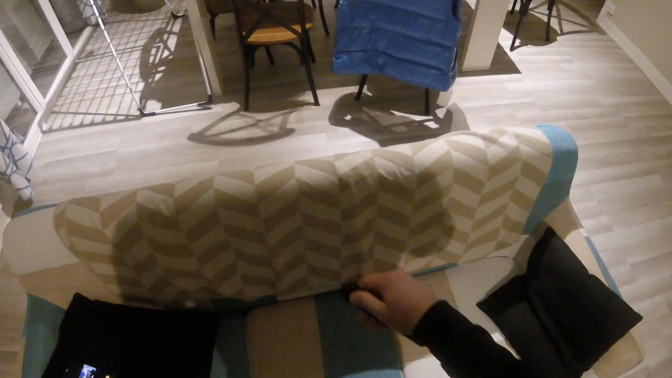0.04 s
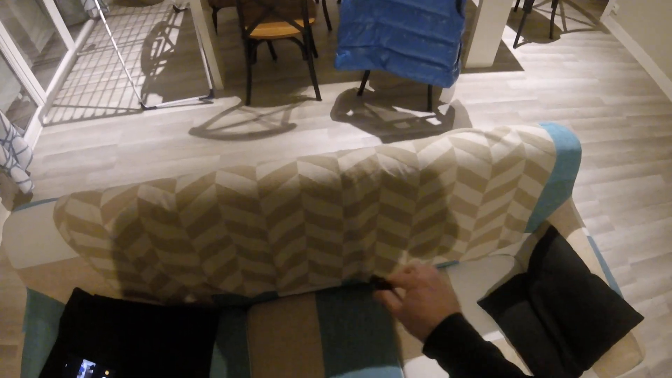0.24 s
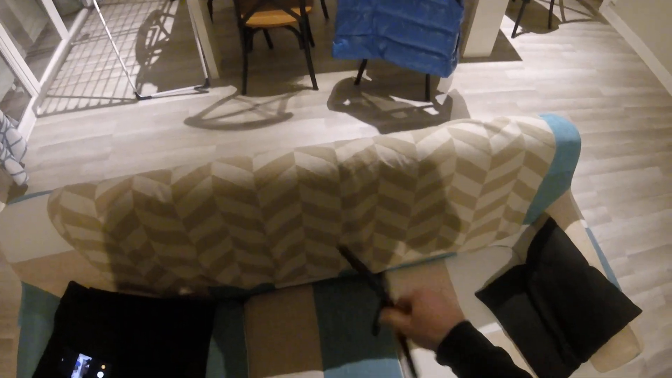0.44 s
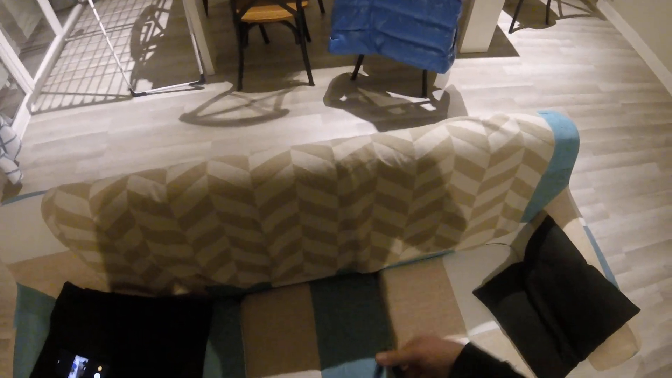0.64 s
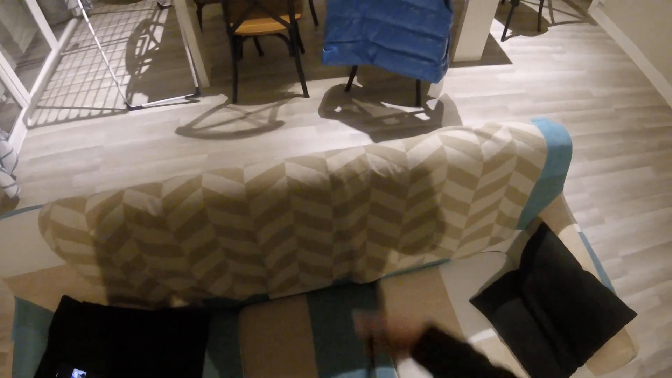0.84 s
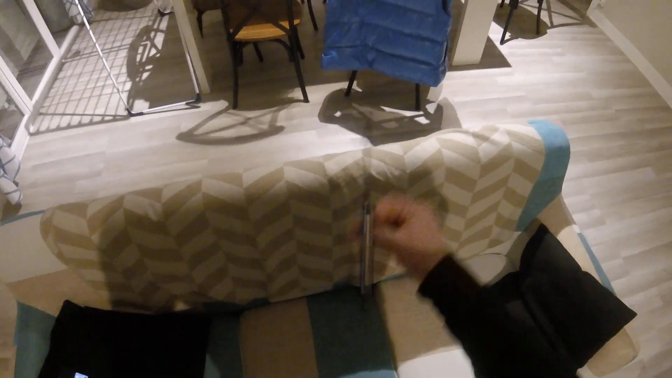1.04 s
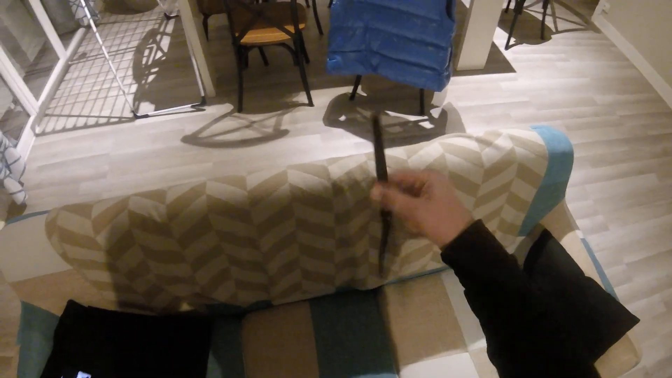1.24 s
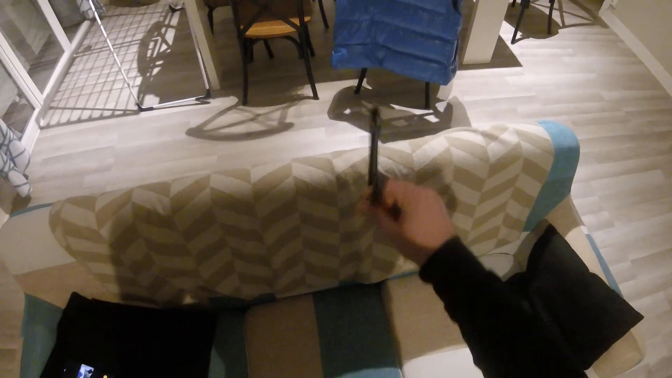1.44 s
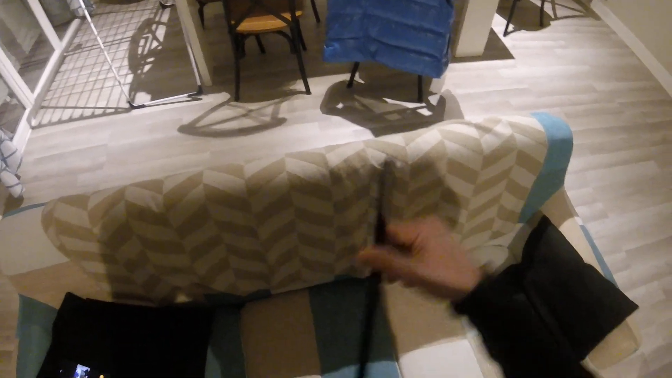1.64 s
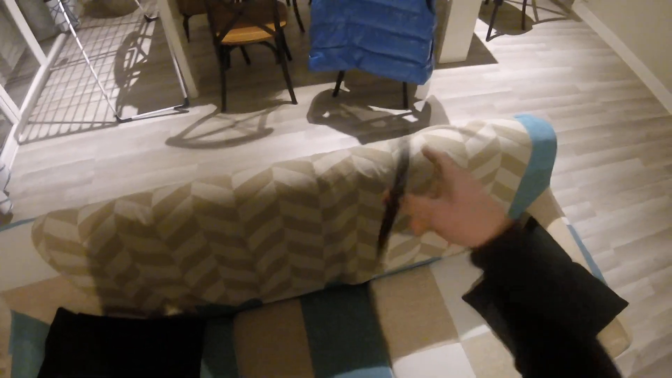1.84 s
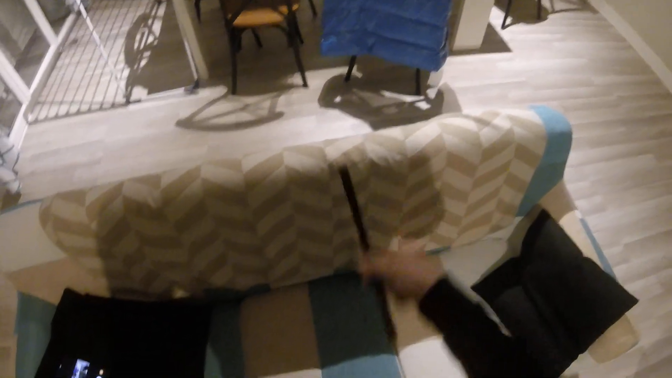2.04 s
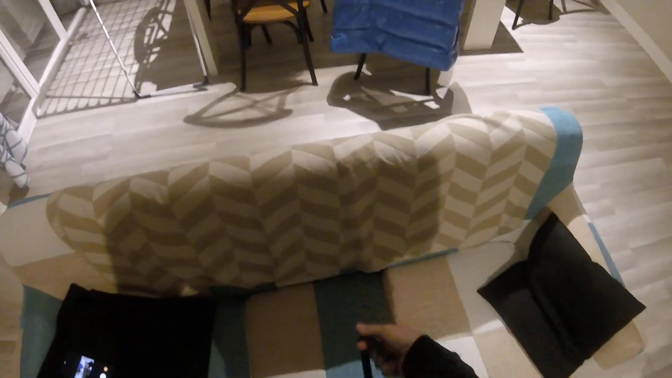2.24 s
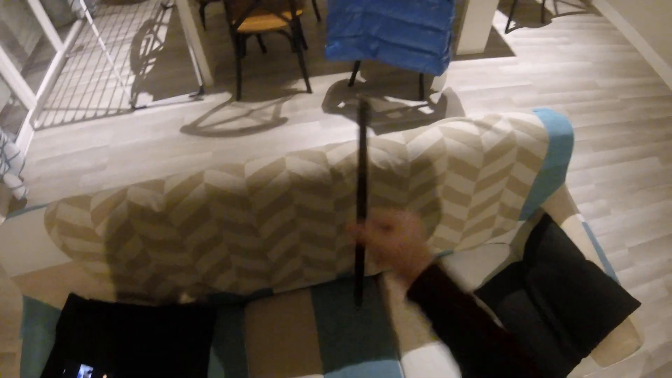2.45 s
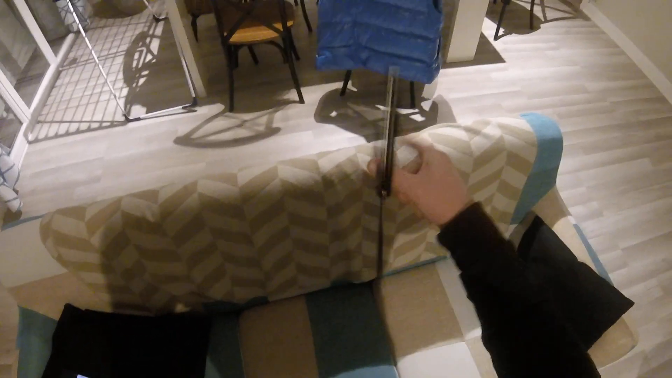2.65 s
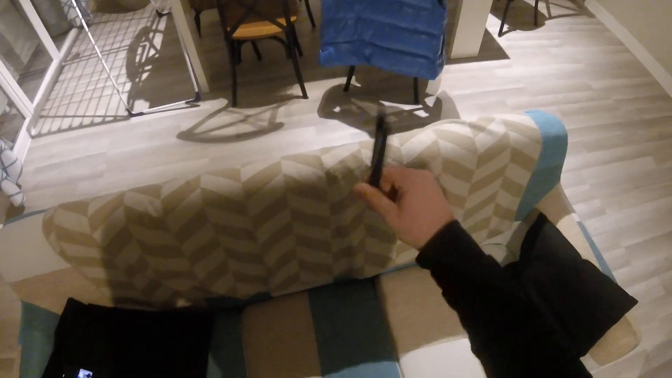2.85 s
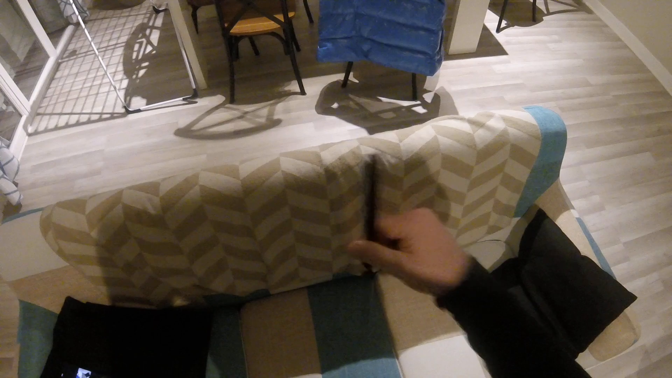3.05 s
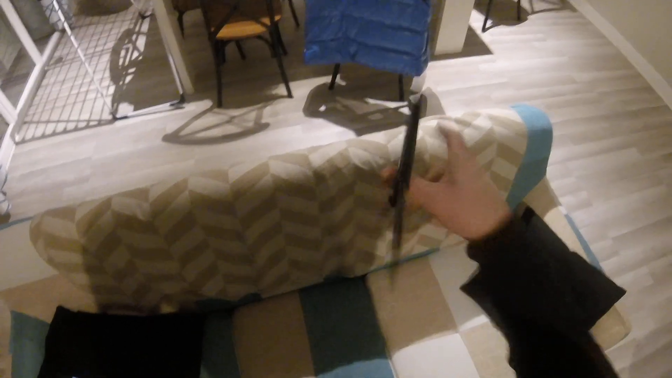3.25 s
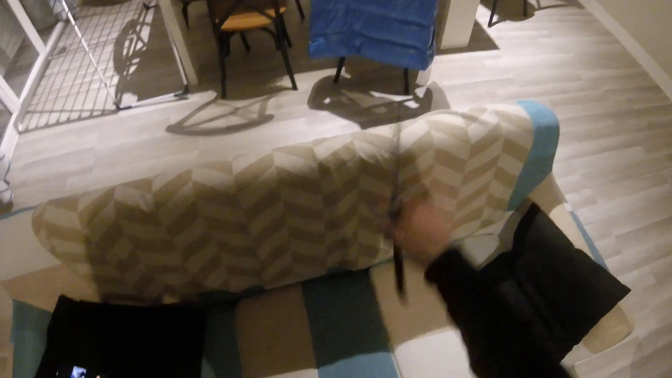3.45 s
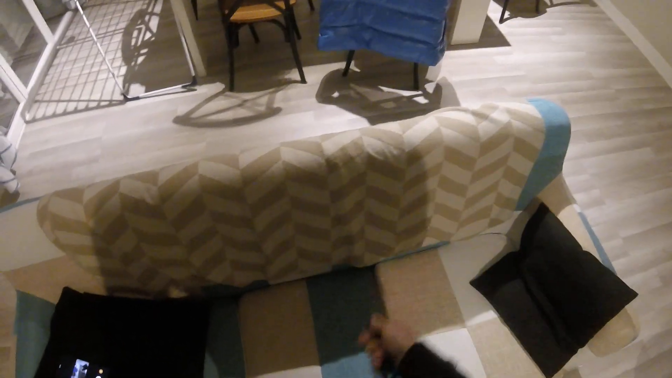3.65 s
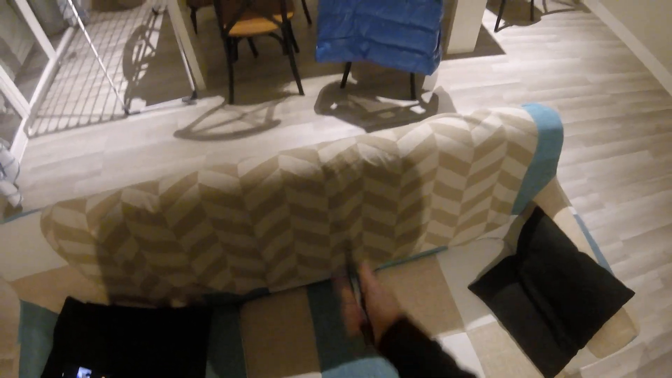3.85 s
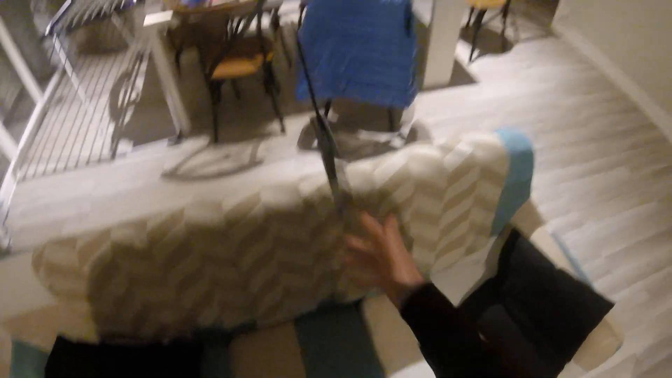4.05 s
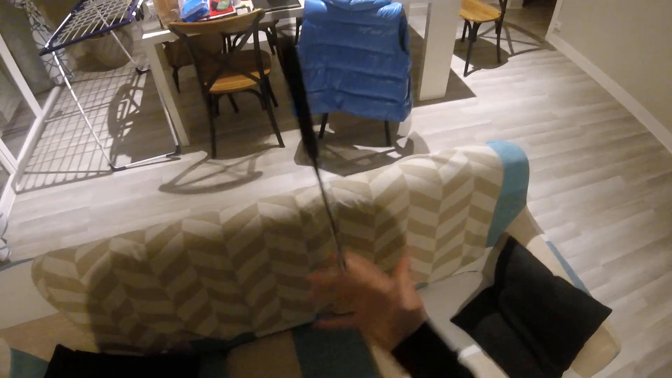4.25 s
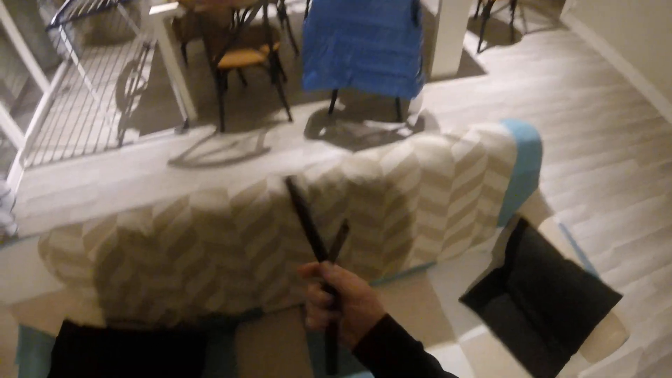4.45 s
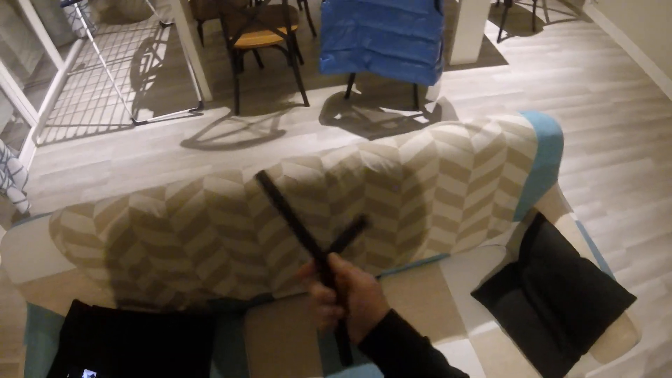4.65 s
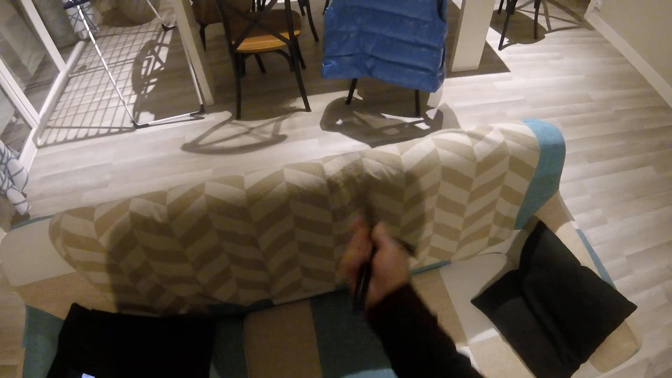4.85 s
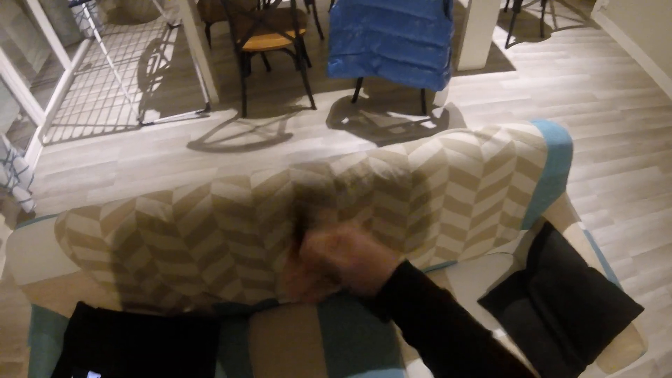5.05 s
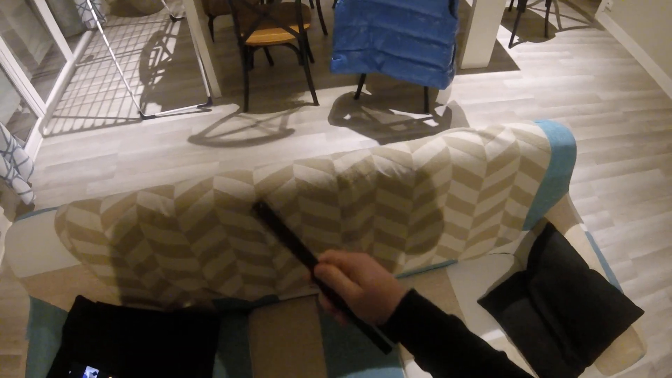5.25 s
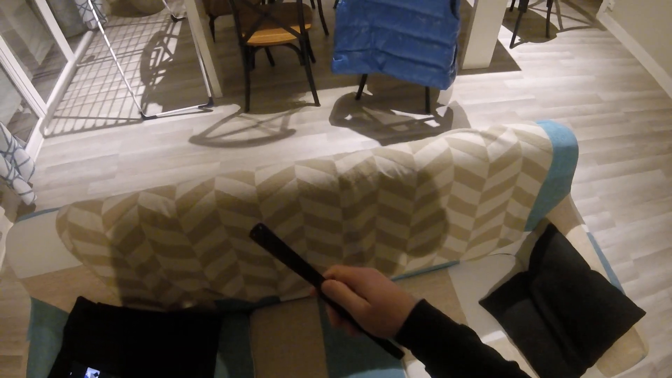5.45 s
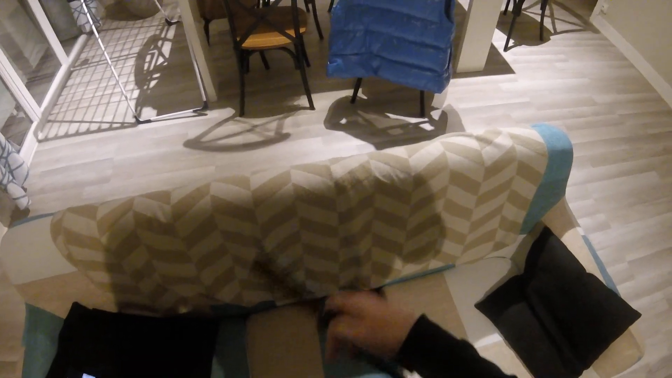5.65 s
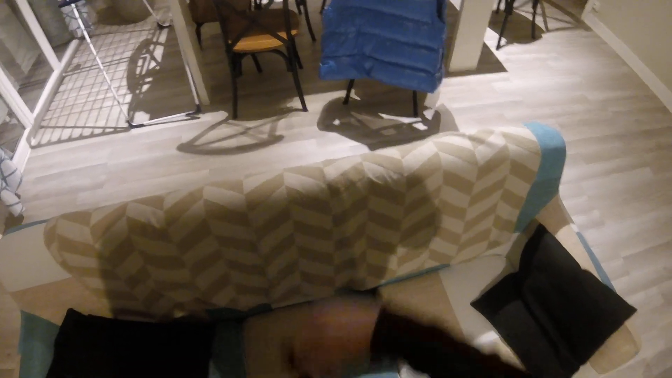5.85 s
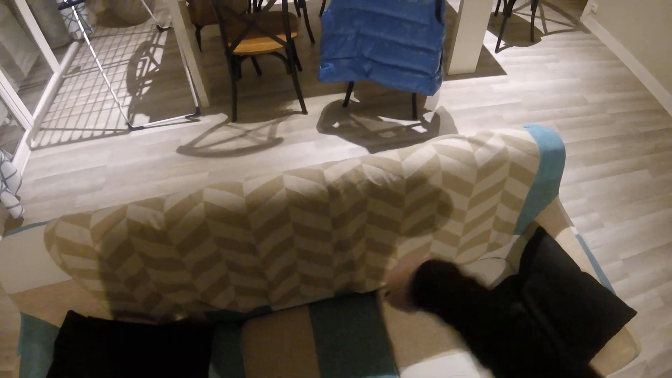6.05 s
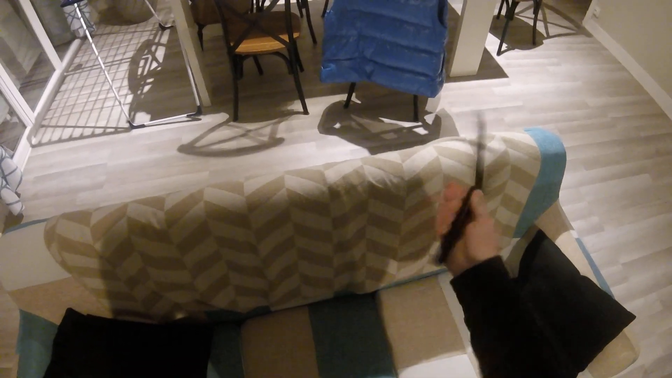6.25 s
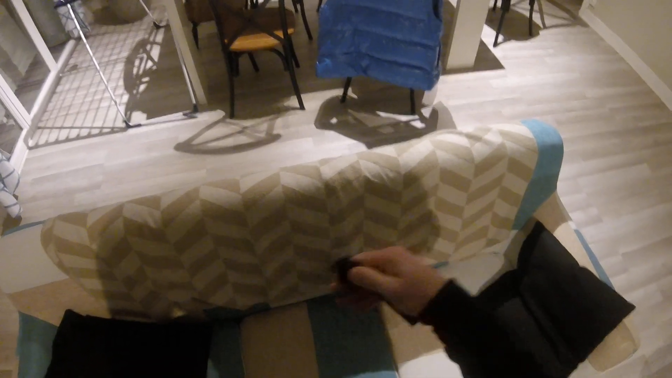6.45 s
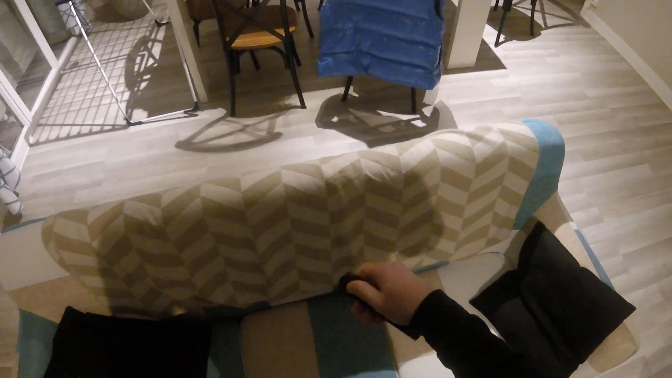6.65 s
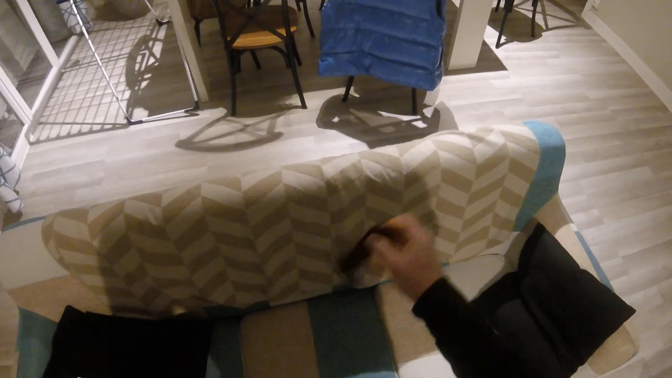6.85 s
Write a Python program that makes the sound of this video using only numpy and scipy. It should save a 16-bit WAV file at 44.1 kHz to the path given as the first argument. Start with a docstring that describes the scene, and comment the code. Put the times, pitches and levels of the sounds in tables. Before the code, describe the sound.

Sharp, irregular steel clicks come from a butterfly knife being twirled near the microphone. After an opening clack, the loose pivots tick quietly and the handles snap together in the hand with small gaps between. Late on comes the hardest clack, with a brief metallic ring, then several more quick clacks. Each echoes slightly in a quiet room with a low hum and faint hiss.

```python
"""Sharp steel clacks ring out in a living room, over a faint hum and hiss: a butterfly knife is flipped.
Its handles hit the blade and bounce, its loose pivots tick, and the handles meet in the palm.
Each touch is a short chatter of steel parts, damped by the hand, and the room rings on after it.
The hardest clack makes a nearby camera's gain control turn everything down and recover slowly."""
import sys
import numpy as np
from scipy import signal
from scipy.fft import rfft, irfft, next_fast_len
from scipy.io import wavfile
from scipy.ndimage import uniform_filter1d, minimum_filter1d, map_coordinates

SR = 44100
rng = np.random.default_rng(int(sys.argv[2]) if len(sys.argv) > 2 else 0)


def put_to_file(sound):
    """Save the sound as 16-bit audio at rate SR, in the file named by the first command-line argument."""
    columns = np.atleast_2d(sound).T  # one column per channel
    safe = np.clip(columns, -1, 1)
    whole_steps = np.round(safe * 32767)
    wavfile.write(sys.argv[1], SR, whole_steps.astype(np.int16))


N = 304731

# The handles' high and low notes. Each row: pitch in Hz, level in dB, seconds to fade by 60 dB.
HANDLE_HIGH_NOTES = [(4200, -12, 0.0057), (5566, 0, 0.0039), (6310, -1.5, 0.0053), (6443, -2, 0.0083),
                     (7490, -5.5, 0.0058), (7840, -11.5, 0.0044), (8850, -13.5, 0.0075),
                     (10710, -23.5, .005)]
HANDLE_LOW_NOTES = [(2370, -1.5, .005), (2584, 1.5, 0.0055), (3020, -3, 0.0045)]
# The blade's notes, held and free. Each row: multiple of its pitch, level in dB, seconds to fade by 60 dB.
HELD_BLADE_NOTES = [(1, -3, 0.013), (1.055, -6, 0.00692)]
FREE_BLADE_NOTES = [(.972, -5, .2), (.99, -2.5, 0.24), (1.012, -1, 0.28), (1.03, -3.5, .25),
                    (1.06, -8, .22)]
# Five tone colours. Each row: frequency in Hz, level in dB.
CRACK_COLOUR = [(600, -46.5), (1800, -19.5), (2500, -12), (3500, -4), (5000, 2.5), (6500, -0.5),
                (8000, -4.5), (10000, -16.5), (12000, -27.5), (14000, -26.5), (16000, -42.5)]  # steel on steel
KNOCK_COLOUR = [(60, -21), (250, -4), (600, -1), (1200, 1.5), (1900, -5.5), (3000, -18.5), (6000, -49.5)]  # the knife in the hand
THIN_STEEL_COLOUR = [(600, -16), (1750, -11.5), (2250, -1)]  # thin steel gives off little bass
ECHO_COLOUR = [(200, 5.5), (1000, 1), (1800, 5), (2500, 2), (3700, 1), (4700, -0.5), (5600, -2.5),
               (7000, 0), (11000, 0.5)]  # the room's answer
AIR_COLOUR = [(22, -3.5), (38, -4.5), (70, -4), (100, -7.5), (130, -11.5), (300, -19), (1000, -25.5),
              (2600, -29), (4200, -38), (5800, -35), (6500, -21), (7200, -26.5), (10300, -36), (13500, -40)]  # room rumble and microphone hiss
# How long the room rings. Each row: frequency in Hz, seconds to fade by 60 dB.
ECHO_FADE = [(200, 0.48), (1000, 0.59), (2500, 0.51), (3900, 0.5), (4650, 0.53), (5400, 0.48), (8000, 0.48),
             (12000, 0.28)]
# A handle hits the blade. Each row: start in seconds, clack level in dB, brightness in dB per octave,
# blade level over the clack in dB, blade pitch in Hz, grip from 0 to 1, first bounce in seconds,
# loss per bounce in dB, extra echo in dB.
HANDLE_STRIKES = [(-.02, -26, -4.5, 0.5, 4900, 0.97, 0.0056, 15, 1),
                  (.0148, -23, -1, -2.5, 4850, 0.6, 0.0023, 11, -3.5),
                  (1.467, -42.5, -1, -8, 4680, 0.9, 0.0051, 3, 4.5),
                  (2.0366, -34, 6, -11, 5180, 0.18, .005, 18, -2),
                  (3.4647, -46, 3, -8, 4740, 0.46, .021, 10, 3),
                  (4.4106, -40.5, -5.5, -2.5, 5040, 1, 0.011, 13, -7),
                  (4.495, -43.5, -3, -10, 4350, .9, .0035, 10, -0.5),
                  (5.0466, -23.5, -4.5, -2.5, 4790, 0.83, 0.013, 12.5, -3.5),
                  (5.237, -5, 1.5, -5, 4568, 0.07, .0083, 17, -2),
                  (6.1195, -30.5, 0, -5.5, 4690, 0.77, 0.0048, 1, 5.5),
                  (6.3672, -37.5, -3.5, 7.5, 4730, 0.84, .003, 7, -3),
                  (6.3875, -47.5, -6, 8, 4750, 0.8, 0.0027, 14, -6),
                  (6.5656, -26, -2, -5.5, 4760, 0.77, .0018, 5, -.5),
                  (6.6235, -24.5, 1.5, -3.5, 4640, 0.66, 0.0041, 15, -6)]
# Light touches of steel: mostly the pivots ticking, and the last two rows a handle grazing just before the blow
# at 6.62 s. Each row: start in seconds, level in dB, brightness in dB per octave.
LIGHT_TICKS = [(0.624, -60.5, -1), (.7125, -57, -1), (0.837, -55, 2), (1.36, -62, 3), (1.4612, -55, -1),
               (1.6645, -57.5, 0), (1.819, -60.5, -13), (2.215, -58, -9), (2.3077, -53, 10),
               (2.334, -56, -8), (3.247, -63, -4), (3.4067, -53, -3.5), (4.518, -56, 3), (4.538, -57, -3),
               (5.2118, -45, -3.5), (6.6163, -40, -8), (6.6194, -38.5, -5)]
# The handles meet in the palm. Each row: start in seconds, clack level in dB, brightness in dB per
# octave, knock level over the clack in dB, graze level over the clack in dB.
PALM_CATCHES = [(1.5964, -50.5, -1, -2, -13), (2.315, -43, 2, -5.5, -5), (2.905, -36, -3, -11.5, -9),
                (3.7764, -46.5, -2.5, -3, -5), (4.476, -49, -6, -17, -2.5)]

CONTACT_S = .003  # how long one touch lasts
HELD_BLADE_DB, HELD_BLADE_HZ = -8, 4740  # the blade in ticks and catches; its level is over the clack


def amp(db):
    """Turn decibels into a number to multiply by."""
    return 10 ** (np.asarray(db) / 20)


def unit(x):
    """Scale a sound to an average power of 1."""
    return x / np.sqrt(np.mean(x ** 2) + 1e-20)


def burst(x):
    """Scale a click to the energy of one touch at power 1."""
    return x * np.sqrt(CONTACT_S * SR / (np.sum(x ** 2) + 1e-20))


def along(points, hz):
    """Read between the rows of a (Hz, value) table, with octaves evenly spaced."""
    row_hz, values = np.transpose(points)
    return np.interp(np.log(hz + 1), np.log(row_hz + 1), values)


def wobble(rate):
    """A smooth curve through `rate` random points a second."""
    points = rng.standard_normal(int(N * rate / SR) + 4)
    return map_coordinates(points, [np.arange(N) * rate / SR])


def filtered(x, response):
    """Multiply each frequency of a long sound by response(Hz)."""
    size = next_fast_len(N + SR // 4)
    return irfft(rfft(x, size) * response(np.fft.rfftfreq(size, 1 / SR)), size)[:N]


def coloured(x, colour, size=2048):
    """Turn each frequency of a click up or down by colour(Hz) decibels."""
    cepstrum = irfft(colour(np.fft.rfftfreq(size, 1 / SR)) * np.log(10) / 20)
    # folding it in half makes the filter ring only after the click
    cepstrum[1:size // 2] *= 2
    cepstrum[size // 2 + 1:] = 0
    return irfft(rfft(x, size) * np.exp(rfft(cepstrum)))[:len(x)]


def add(track, sound, start_s):
    """Mix a sound into the track at a time in seconds."""
    start = round(start_s * SR)
    part = sound[max(-start, 0):len(track) - start]
    track[max(start, 0):][:len(part)] += part


def ring(notes, t, scale=1):
    """Struck steel rings and fades; grip and point of contact vary each note a little."""
    hz, db, fade_s = np.transpose(notes)[:, :, None]
    strength, shift, phase = rng.standard_normal((3, len(notes), 1))
    hz = scale * hz * (1 + .005 * shift)
    db = db + 1.5 * strength
    waves = np.sin(2 * np.pi * (hz * t + phase))
    attack = 1 - np.exp(-t / 0.00027)
    return attack * np.sum(amp(db - 60 * t / fade_s) * waves, axis=0)


def chatter(t, fade_s):
    """Loose pivots rattle for a few milliseconds after a blow."""
    return rng.standard_normal(len(t)) * amp(-60 * t / fade_s)


def contact(clack_db, brightness, blade_db, blade_hz, knock_db, size=1024):
    """One blow: the handles crack and ring, the blade sings, the hand takes a dull knock."""
    t = np.arange(size) / SR
    crack = coloured(chatter(t, fade_s=0.017), lambda hz: along(CRACK_COLOUR, hz))
    clack = burst(ring(HANDLE_HIGH_NOTES, t)) + amp(-1.5) * burst(crack)
    # a harder blow is shorter, so it is brighter and bends the handles less
    steel = burst(coloured(clack, lambda hz: brightness * np.log2(np.clip(hz, 3300, 11000) / 6000)))
    steel += amp(-11.5 - 0.8 * brightness) * burst(ring(HANDLE_LOW_NOTES, t))
    steel += amp(blade_db) * burst(ring(HELD_BLADE_NOTES, t, blade_hz))
    steel = coloured(steel, lambda hz: along(THIN_STEEL_COLOUR, hz))
    knock = coloured(chatter(t, fade_s=0.015), lambda hz: along(KNOCK_COLOUR, hz))
    return amp(clack_db) * (steel + amp(knock_db) * burst(knock))


def room(sound, reflections=7):
    """The room's echo: a few quick reflections from floor and furniture, and a smooth fading tail."""
    hz, t, noise = signal.stft(rng.standard_normal(SR * 3 // 5), SR, nperseg=256)
    fade = amp(along(ECHO_COLOUR, hz)[:, None] - 60 * t / along(ECHO_FADE, hz)[:, None])
    tail = signal.istft(noise * fade, SR, nperseg=256)[1]
    tail /= np.linalg.norm(tail)
    delays_s = rng.uniform(.002, .022, reflections)
    tail[(delays_s * SR).astype(int)] += 0.12 * rng.standard_normal(reflections)
    return signal.fftconvolve(sound, tail)


def blow_in_room(blow, extra_echo_db, directions=8, size=2048):
    """A blow goes straight to the microphone, and a different mix of its notes toward each wall."""
    outward = np.zeros(size)
    for delay_s in rng.uniform(.001, .016, directions):
        add(outward, contact(*blow) / np.sqrt(directions), delay_s)
    sound = amp(-7.5 + extra_echo_db) * room(outward)
    add(sound, contact(*blow), 0)
    return sound


def singing_blade(hz):
    """When no finger damps it, the blade rings on into the room."""
    note = ring(FREE_BLADE_NOTES, np.arange(SR // 2) / SR, hz)
    sound = amp(-2.0) * room(note)
    add(sound, amp(-12.5) * note, 0)
    return sound


def strikes(hits=3, bounce_shrink=0.63):
    """A swinging handle hits the blade and bounces, each time sooner and weaker."""
    track = np.zeros(N)
    for start_s, db, brightness, blade_db, hz, grip, bounce_s, loss_db, echo_db in HANDLE_STRIKES:
        # a firm grip trades the blade's long ring for a dull knock
        knock_db = -13.5 + 20 * np.log10(grip)
        ring_gain = (1 - grip) ** 2 * amp(db + blade_db - 14)
        add(track, ring_gain * singing_blade(hz), start_s)
        for hit in range(hits):
            blow = (db - hit * loss_db, brightness, blade_db, hz, knock_db)
            add(track, blow_in_room(blow, echo_db), start_s)
            start_s += bounce_s * bounce_shrink ** hit
    return track


def hum(hz, slow_phase, fast_phase, level_db):
    """A low, faint, steady hum near 91 Hz."""
    phase = 2 * np.pi * hz * np.arange(N) / SR + slow_phase * wobble(4) + fast_phase * wobble(24)
    return amp(level_db + 0.39 * wobble(6.3)) * unit(np.sin(phase))


def air(level_db):
    """Steady room rumble and microphone hiss."""
    noise = filtered(rng.standard_normal(N), lambda hz: amp(along(AIR_COLOUR, hz)))
    return amp(level_db) * unit(noise)


def tick(db, brightness, knock_db=-10.5):
    """A light touch of steel on steel."""
    return blow_in_room((db, brightness, HELD_BLADE_DB, HELD_BLADE_HZ, knock_db), extra_echo_db=.5)


def light_touches():
    """Light touches: the loose pivots tick while the knife twirls, and a handle grazes twice just before its
    blow at 6.62 s."""
    track = np.zeros(N)
    for start_s, db, brightness in LIGHT_TICKS:
        add(track, tick(db, brightness), start_s)
    return track


def catches(graze_lead_s=.0043, settle_s=.0018, settle_loss_db=0.1):
    """The handles' tips graze brightly, then the handles knock together in the palm and press flat."""
    track = np.zeros(N)
    for start_s, db, brightness, knock_db, graze_db in PALM_CATCHES:
        add(track, tick(db + graze_db, brightness + 5), start_s - graze_lead_s)
        for delay_s, loss_db in [(0, 0), (settle_s, settle_loss_db)]:
            blow = (db - loss_db, brightness, HELD_BLADE_DB, HELD_BLADE_HZ, knock_db)
            add(track, blow_in_room(blow, extra_echo_db=0.8), start_s + delay_s)
    return track


def gain_control(x, limit_db, recovery_db_per_s, ahead_s):
    """The camera turns down just before a sound passes the limit, then creeps back up."""
    power = np.abs(uniform_filter1d(x ** 2, round(CONTACT_S * SR)))
    needed_db = np.minimum(limit_db - 10 * np.log10(power + 1e-12), 0)
    early_db = minimum_filter1d(needed_db, 2 * round(ahead_s * SR) + 1)
    climb_db = recovery_db_per_s * np.arange(N) / SR
    gain_db = np.minimum.accumulate(early_db - climb_db) + climb_db
    smooth_db = uniform_filter1d(gain_db, round(.008 * SR))
    return x * amp(smooth_db)


def scene():
    """The knife over the quiet room, in one channel."""
    background = hum(hz=90.6, slow_phase=2.16, fast_phase=1.0, level_db=-58.0) + air(level_db=-57.5)
    return (strikes() + catches() + light_touches() + background)[None]


def record(dry):
    """The camera holds loud sounds down and cuts off the highest treble."""
    top_hz = 14200
    held = gain_control(dry[0], limit_db=-15.5, recovery_db_per_s=4.5, ahead_s=.039)
    return filtered(held, lambda hz: 1 / np.sqrt(1 + (hz / top_hz) ** 110))[None]


dry = scene()
out = record(dry)
put_to_file(out)
```